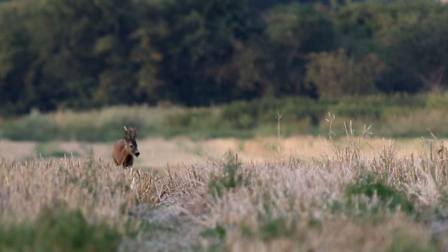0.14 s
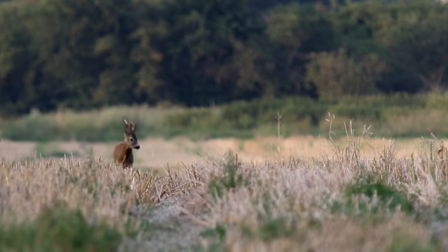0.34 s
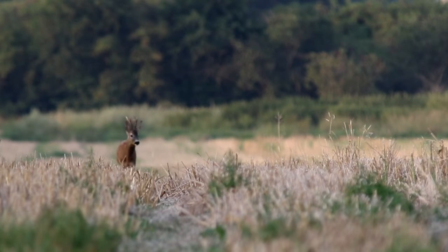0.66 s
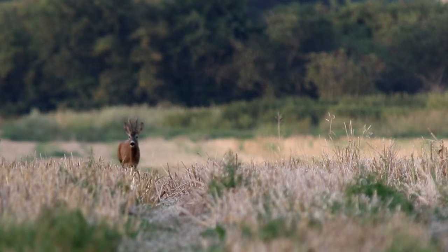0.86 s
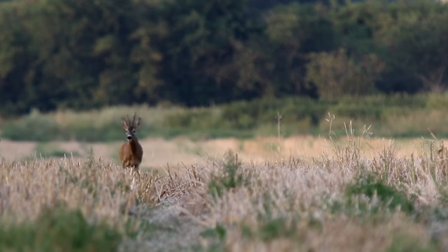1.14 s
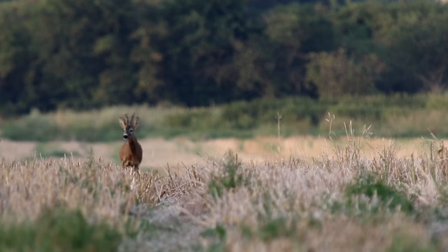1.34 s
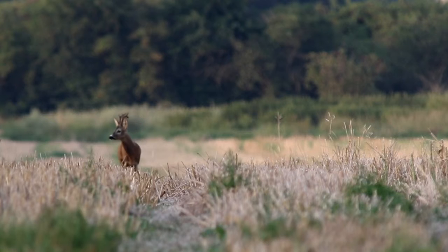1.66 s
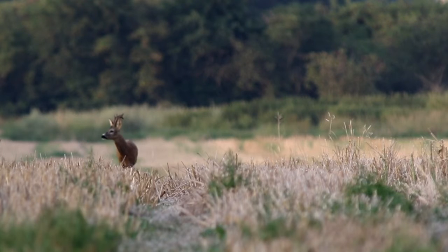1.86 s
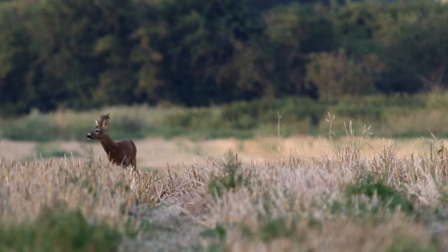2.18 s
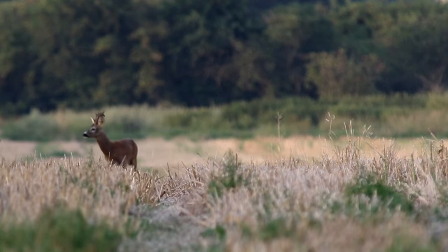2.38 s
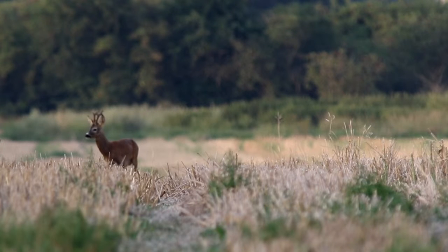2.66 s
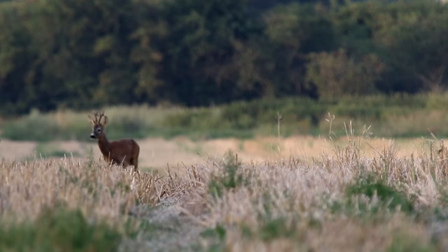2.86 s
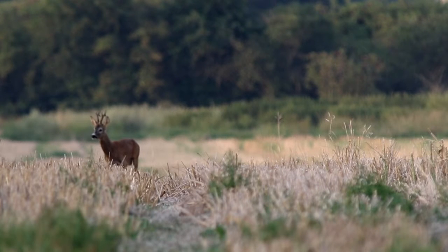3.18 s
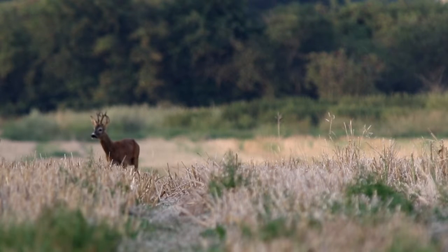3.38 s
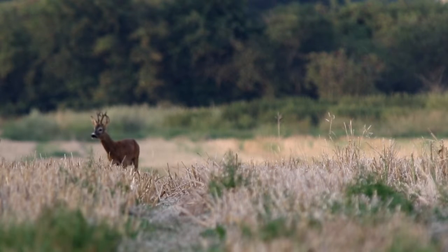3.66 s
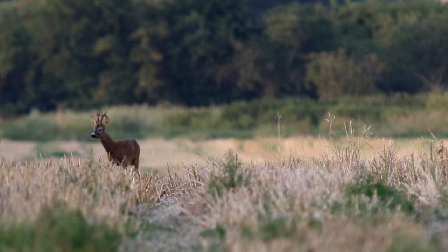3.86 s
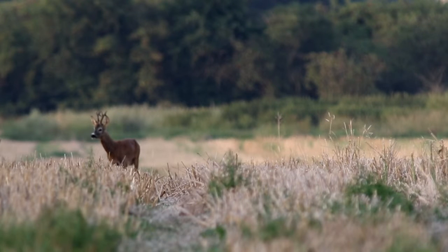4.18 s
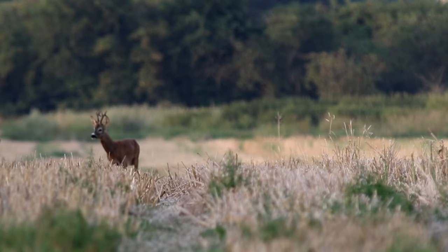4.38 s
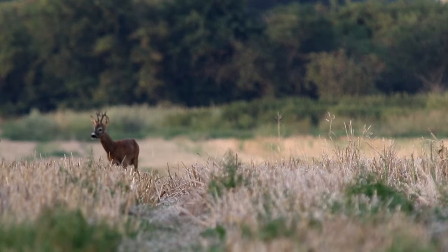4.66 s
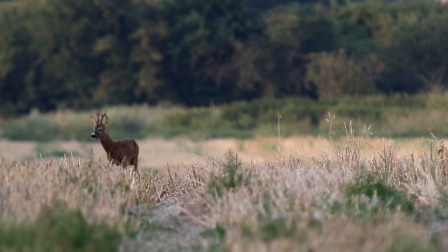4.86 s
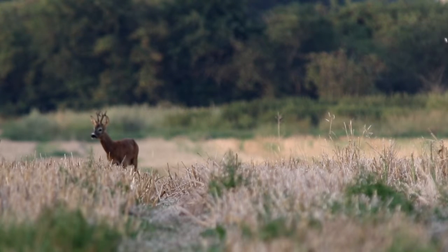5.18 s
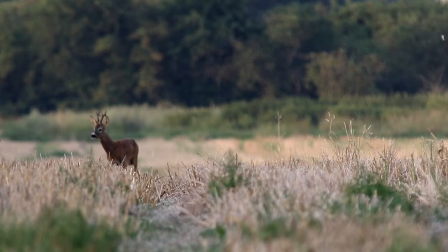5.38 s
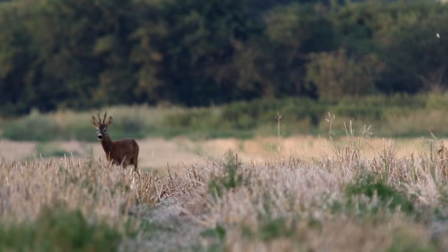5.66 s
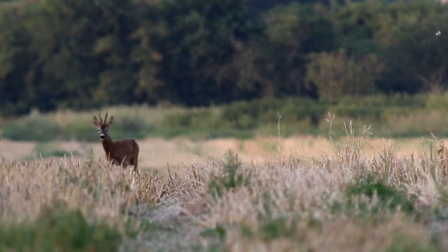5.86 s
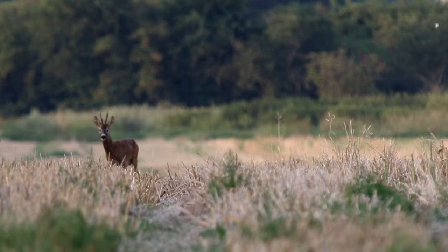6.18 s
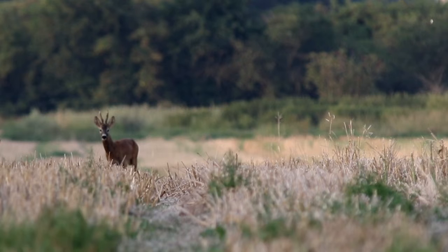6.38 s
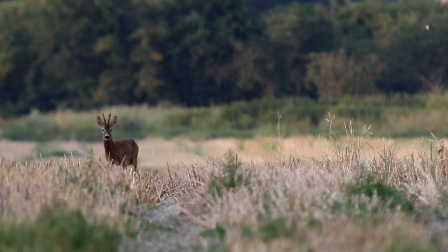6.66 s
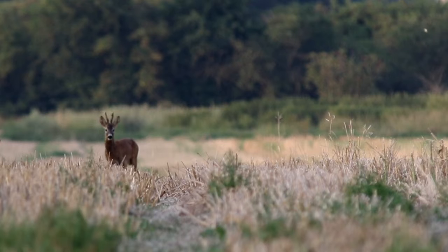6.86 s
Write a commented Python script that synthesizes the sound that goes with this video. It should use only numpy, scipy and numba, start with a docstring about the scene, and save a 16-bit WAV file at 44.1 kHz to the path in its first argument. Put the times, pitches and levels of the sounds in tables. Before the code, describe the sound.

A deer gives one short, high squeak close by in an open field, over faint rasping grasshoppers and soft air.

```python
"""A roe deer gives one short, high, arching squeak: a harmonic voice filtered by throat and muzzle.
The open field scatters it and the edge of the wood answers faintly. Grasshoppers rasp by stridulation
over a soft rush of air; a far drone surges, two faint notes sound, and there are two small dry clicks.
The squeak drives an automatic gain control down, and the field swells back over half a second."""
import sys
import numpy as np
from scipy import signal
from scipy.fft import rfft, irfft, next_fast_len
from scipy.io import wavfile
from scipy.ndimage import uniform_filter1d, map_coordinates
from numba import njit

SR = 44100
rng = np.random.default_rng(int(sys.argv[2]) if len(sys.argv) > 2 else 0)


def unload_audio(sound):
    """Save the sound as a 16-bit wav file, at the path given as the first command line argument."""
    columns = np.transpose(np.atleast_2d(sound))
    # keep every value between -1 and 1, then stretch to whole-number steps
    steps = np.round(np.clip(columns, -1, 1) * 32767)
    wavfile.write(sys.argv[1], SR, steps.astype(np.int16))


N = 309582


def amp(db):
    """Amplitude ratio of a level in decibels."""
    return 10 ** (np.asarray(db) / 20)


def unit(x):
    """Normalisation to rms 1."""
    return x / np.sqrt(np.mean(x ** 2) + 1e-20)


def bell(x, width):
    """Gaussian of height 1 around x = 0."""
    return np.exp(-.5 * (x / width) ** 2)


def along(points, hz):
    """Interpolation of (frequency, value) points on a logarithmic frequency axis."""
    freqs, values = np.transpose(points)
    return np.interp(np.log(hz + 1), np.log(freqs + 1), values)


def wobble(rate, size=N):
    """Smooth random modulation: a spline through `rate` knots a second."""
    knots = rng.standard_normal(int(size * rate / SR) + 4)
    at = np.arange(8 * len(knots)) / 8
    return np.interp(np.arange(size) * rate / SR, at, map_coordinates(knots, [at], mode="nearest"))


def filtered(x, response):
    """Linear filtering: the spectrum of x times a frequency response."""
    size = next_fast_len(len(x) + 8192)
    return irfft(rfft(x, size) * response(np.fft.rfftfreq(size, 1 / SR)), size)[:len(x)]


def minimum_phase(gain):
    """Causal response with these gains: it rings only after it is excited."""
    cepstrum = irfft(np.log(np.maximum(gain, 1e-4)))
    half = len(cepstrum) // 2
    return np.exp(rfft(np.r_[cepstrum[0], 2 * cepstrum[1:half]], len(cepstrum)))


def noise(spectrum):
    """Spectral shaping of white noise, at rms 1."""
    return unit(filtered(rng.standard_normal(N), lambda hz: amp(along(spectrum, hz))))


# Spectrum of distant air: (frequency [Hz], relative level [dB])
AIR_SPECTRUM = [(25, -30.5), (60, -2), (150, -0.5), (300, -2), (600, -0.5), (950, -3.5), (1400, -7.5),
                (2000, -10.5), (3000, -13.5), (4500, -18), (7000, -31.5), (12000, -50.5)]
# Spectrum of far insects and hiss: (frequency [Hz], relative level [dB])
HISS_SPECTRUM = [(2500, -22), (5000, -4.5), (7000, 1), (9500, -0.5), (13000, -3), (15500, -6)]


def air(rush_db=-56, swell_db=1.12, swell_at=3.2, swell_s=1.1, hiss_db=-63.5,
        rumble_db=-63, rumble_db_per_s=-.52):
    """Broadband noise: a rush with one broad swell, a lumpy rumble that eases, and an even hiss."""
    t = np.arange(N) / SR
    rush = amp(rush_db + swell_db * bell(t - swell_at, swell_s) + .55 * wobble(6)) * noise(AIR_SPECTRUM)
    lumps_db = rumble_db + rumble_db_per_s * t + 2 * wobble(5.5)
    rumble = noise([(20, -27), (30, -12), (38, 1), (55, -.5), (120, -15.5), (400, -50.5), (1000, -100)])
    return rush + amp(lumps_db) * rumble + amp(hiss_db) * noise(HISS_SPECTRUM)


# Harmonics of the drone: (harmonic number, relative level [dB])
DRONE_HARMONICS = [(1, -6), (2, 0.5), (3, -13.5), (4, -10), (5, -4.5), (6, -7)]
# Its surges: (onset [s], duration [s], top pitch [Hz], level [dB])
DRONE_SURGES = [(2.54, .39, 210, -60), (3.19, .55, 213, -62.5), (4.08, 0.817, 212, -65.5),
                (6.42, .6, 196, -63)]


def drone(rest_hz=193.5, sag_s=.3, attack_s=.11, release_s=.07, fade_db_per_s=4,
          dull_db=-10.5, bright_db_per_hz=.9, waver=.009, flutter_db=3):
    """A far harmonic buzz, modulated in surges: as the pitch sags, the upper partials weaken."""
    t = np.arange(N) / SR
    level, weighted_hz = np.full(N, 1e-9), np.zeros(N)
    for onset, length, top_hz, db in DRONE_SURGES:
        age = np.maximum(t - onset, 0)
        gate = bell(np.minimum(t - onset, 0), attack_s) * bell(np.maximum(age - length, 0), release_s)
        surge = gate * amp(db - fade_db_per_s * age)
        level += surge
        weighted_hz += surge * (top_hz - rest_hz) / (1 + (age / sag_s) ** 2)
    lift_hz = weighted_hz / level
    bright_db = dull_db + bright_db_per_hz * lift_hz
    phase = 2 * np.pi * np.cumsum((rest_hz + lift_hz) * (1 + waver * wobble(40))) / SR
    return level * sum(amp(db + bright_db * (k > 2) + flutter_db * wobble(26)) * np.sin(round(k) * phase)
                       for k, db in DRONE_HARMONICS)


# Faint far notes: (time [s], centre frequency [Hz], level [dB])
FAR_NOTES = [(2.86, 1840, -61.5), (3.55, 1950, -62.5)]


def far_notes(width_s=.029, width_hz=100):
    """Narrow-band noise under Gaussian envelopes: short notes blurred by distance."""
    out, t = np.zeros(N), np.arange(N) / SR
    for at, centre_hz, db in FAR_NOTES:
        band = unit(filtered(rng.standard_normal(N), lambda hz: bell(hz - centre_hz, width_hz)))
        out += amp(db) * bell(t - at, width_s) * band
    return out


# Grasshopper songs: (first crest [s], last crest [s], stroke count, final level [dB], rasp centre [Hz])
GRASSHOPPER_SONGS = [(.262, 1.785, 10, -57.7, 9800), (2.96, 2.96, 1, -62, 12000),
                     (3.28, 5.848, 15, -58, 7850), (3.86, 3.86, 1, -60.5, 11000),
                     (6.11, 6.98, 6, -60, 8150), (6.23, 6.23, 1, -62.5, 11500)]


def leg_strokes(swell_db=10, swell_power=3.3):
    """Periodic strokes that swell through each song: yields (crest [s], level [dB], centre [Hz])."""
    for first, last, count, db, centre_hz in GRASSHOPPER_SONGS:
        count = round(count)
        for k, at in enumerate(np.linspace(first, last, count)):
            yield at, db - swell_db * (1 - (k + 1) / count) ** swell_power, centre_hz


# Response of the wing: (frequency [Hz], gain [dB])
WING_RESPONSE = [(4500, -34.5), (5600, -12.5), (6500, -1), (9000, -1), (10500, -3.5), (13000, -1.5),
                 (15500, -9.5)]


def grasshoppers(rise_s=.043, fall_s=.029, tooth_hz=105, uneven=.45, tooth_db=3.3, tooth_t60=.013,
                 scrape=.24, peak_db=6.5, width_hz=1400):
    """Stridulation: each leg stroke is a row of uneven tooth ticks over a scrape, filtered by the wing."""
    out, t = np.zeros(N + SR), np.arange(SR // 3) / SR
    crest = t[len(t) // 2]
    envelope = bell(t - crest, np.where(t < crest, rise_s, fall_s))
    for at, db, centre_hz in leg_strokes():
        tooth_rate = tooth_hz * np.exp(uneven * wobble(100, len(t)))
        teeth_passed = np.floor(rng.random() + np.cumsum(tooth_rate) / SR)
        impacts = np.diff(teeth_passed, prepend=0) * amp(tooth_db * wobble(100, len(t)))
        ticks = signal.fftconvolve(impacts, amp(-60 * t / tooth_t60))[:len(t)]
        friction = (scrape + ticks) * rng.standard_normal(len(t))
        wing = lambda hz: amp(along(WING_RESPONSE, hz) + peak_db * bell(hz - centre_hz, width_hz))
        start = max(0, round((at - crest) * SR))
        out[start:][:len(t)] += amp(db) * envelope * unit(filtered(friction, wing))
    return out[:N]


# Dry contacts in two clusters: (time [s], level [dB], gain at 4 kHz [dB])
CONTACTS = [(.27, -36.5, -14), (0.273, -43, -14), (6.5961, -40, -15), (6.600, -31, -2),
            (6.6016, -26.5, -6.5), (6.6032, -21, 1), (6.605, -22, -6)]
# Modes they excite: (frequency [Hz], relative level [dB], 60 dB decay time [s])
CONTACT_MODES = [(355, -14, 0.06), (950, -12, 0.031), (1645, -3.5, 0.015), (1860, -8, 0.013),
                 (2500, -29, 0.0083), (3110, -6, 0.0081), (3750, -6, 0.01)]


def clicks(crack=.56, crack_t60=.016):
    """Impact excitation: a crack of noise and a few damped modes; soft contacts lose their treble."""
    out, t = np.zeros(N + SR), np.arange(SR // 8) / SR
    ring = sum(amp(db - 60 * t / t60) * np.sin(2 * np.pi * hz * t) for hz, db, t60 in CONTACT_MODES)
    for at, db, treble_db in CONTACTS:
        snap = crack * rng.standard_normal(len(t)) * amp(-60 * t / crack_t60)
        colour = [(150, -42), (330, -3), (550, -15), (900, -4), (2000, -1),
                  (4000, treble_db), (6500, treble_db - 22), (12000, treble_db - 29.5)]
        out[round(at * SR):][:len(t)] += amp(db) * filtered(ring + snap, lambda f: amp(along(colour, f)))
    return out[:N]


# Reverberation of the wood's edge: (frequency [Hz], 60 dB decay time [s])
WOOD_DECAY = [(300, .7), (1500, 0.99), (3000, 0.7), (6000, .3), (14000, 0.31)]


def field_echo(x, stubble_db=-32.5, stubble_t60=.26, wood_db=-49):
    """Diffuse scattering as convolution with decaying noise: quick from stubble, long from the trees."""
    hz, t, spectra = signal.stft(rng.standard_normal((2, SR)), SR, nperseg=256)
    colour_db = along([(1500, -1.5), (2900, -2), (4100, 3), (8000, -14.5)], hz)[:, None]
    stubble = signal.istft(spectra[0] * amp(colour_db - 60 * t / stubble_t60), SR, nperseg=256)[1]
    wood = signal.istft(spectra[1] * amp(-60 * t / along(WOOD_DECAY, hz)[:, None]), SR, nperseg=256)[1]
    tail = amp(stubble_db) * stubble / np.linalg.norm(stubble) + amp(wood_db) * wood / np.linalg.norm(wood)
    return signal.fftconvolve(x, tail)[:N]


# Pitch contour of the squeak: (time [s], fundamental frequency [Hz])
PITCH_ARCH = [(1.847, 1400), (1.861, 1487), (1.885, 1536), (1.911, 1545), (1.963, 1499), (1.991, 1449),
              (2.017, 1340), (2.029, 1257), (2.036, 1250)]
# Vocal-fold harmonics above the octave: (harmonic number, relative level [dB])
UPPER_HARMONICS = [(3, 0), (4, .5), (5, -5.5), (6, -9.5), (7, -13.5), (8, -28), (9, -29), (10, -15.5)]
# Antiresonance and formants of throat and muzzle: (frequency [Hz], Gaussian width [Hz], gain [dB])
VOCAL_TRACT = [(1345, 55, -18), (2690, 165, 10), (3880, 160, 6)]


def deer(onset_s=1.8456, length_s=.194, lead_in_hz=1210, break_s=.002,
         attack_db_per_s=5700, overtone_lag=1.5, fade_power=2.7, jitter=.0009, tired_jitter=.006,
         fundamental_db=7.5, octave_db=-6.5, upper_db=-22.5, flutter_db=1.5,
         muzzle_hz=1110, puff_db=-23, puff_s=.001):
    """Source and filter: a tense voice roughens as it tires; its octave sags into a formant, and the overtones
    swell in just after the fundamental."""
    t = np.arange(N) / SR
    age = t - onset_s
    attack_db = attack_db_per_s * np.minimum(age, 0)
    tired = np.clip(age / length_s, 0, 1) ** fade_power
    arch = np.interp(t, *np.transpose(PITCH_ARCH))
    pitch = lead_in_hz + (arch - lead_in_hz) * np.clip(age / break_s + .5, 0, 1)  # the voice breaks upward
    roughness = (jitter + tired_jitter * tired ** 2) * wobble(300)
    phase = 2 * np.pi * np.cumsum(pitch * (1 + roughness)) / SR
    fundamental = amp(fundamental_db) * np.sin(phase)
    octave = amp(octave_db) * np.sin(2 * phase - np.pi / 4)
    upper = sum(amp(upper_db + db + flutter_db * wobble(50)) * np.sin(round(k) * phase)
                for k, db in UPPER_HARMONICS)
    folds = (1 - tired) * (amp(attack_db) * fundamental + amp(overtone_lag * attack_db) * (octave + upper))
    tract = lambda hz: amp(sum(db * bell(hz - centre, width) for centre, width, db in VOCAL_TRACT))
    radiation = lambda hz: (1 + (muzzle_hz / (hz + 1)) ** 10) ** -.5  # a small muzzle radiates little bass
    voice = filtered(folds, lambda hz: minimum_phase(tract(hz) * radiation(hz)))
    # a puff of turbulence as the voice breaks in
    puff = noise([(70, -50), (200, -22), (900, -8), (1900, 3), (3500, -.5), (6000, -10), (15000, -17.5)])
    return voice + amp(puff_db) * puff * bell(age, puff_s)


def scene():
    """Superposition of the squeak, its echo and the sounds of the field."""
    squeak = deer()
    return (squeak + field_echo(squeak) + grasshoppers() + drone() + far_notes() + clicks() + air())[None]


@njit
def gain_control(over_db, attack_s, hold_s, release_db_per_s):
    """Compression: the cut in dB rises fast while the level is too high, holds, then ebbs evenly."""
    cut, wait, out = 0., 0., np.zeros(len(over_db))
    for i in range(len(over_db)):
        wait -= 1 / SR
        if over_db[i] > cut:
            cut += (over_db[i] - cut) / (attack_s * SR)
            wait = hold_s
        elif wait < 0:
            cut = max(0., cut - release_db_per_s / SR)
        out[i] = cut
    return out


def record(dry, threshold_db=-6.7, attack_s=.0007, hold_s=.065, release_db_per_s=27,
           step_db=1., top_hz=15750):
    """Stepped automatic gain control, clipping of its overshoot, and a band limit."""
    x = dry[0]
    over_db = 20 * np.log10(np.abs(x) + 1e-9) - threshold_db
    cut_db = step_db * np.round(gain_control(over_db, attack_s, hold_s, release_db_per_s) / step_db)
    gain = uniform_filter1d(amp(-cut_db), size=7)  # each step is a soft tick under the voice
    return filtered(np.clip(x * gain, -1, 1), lambda hz: hz < top_hz)[None]


dry = scene()
out = record(dry)
unload_audio(out)
```